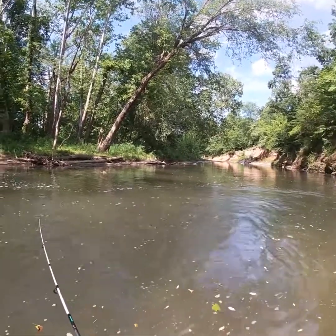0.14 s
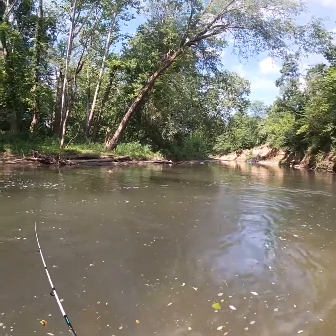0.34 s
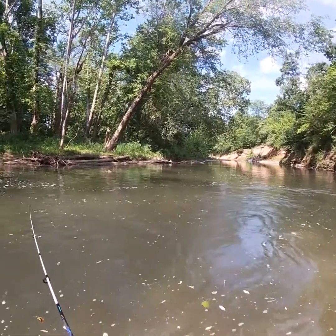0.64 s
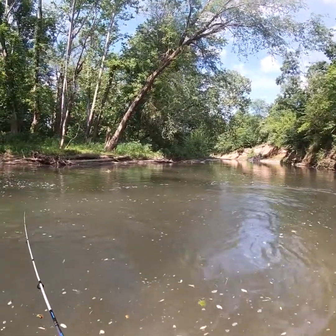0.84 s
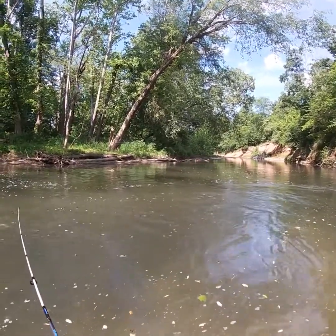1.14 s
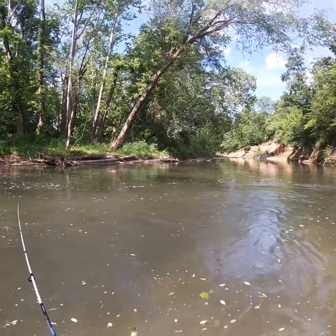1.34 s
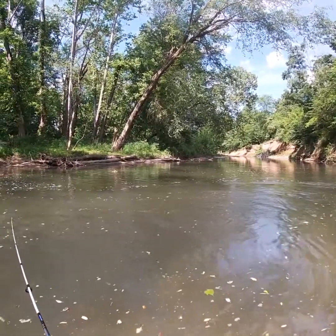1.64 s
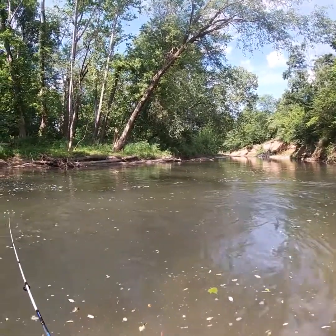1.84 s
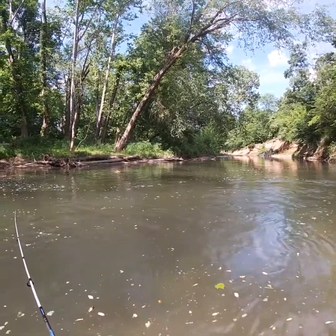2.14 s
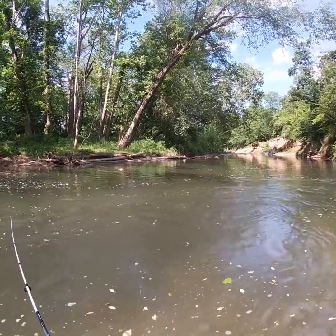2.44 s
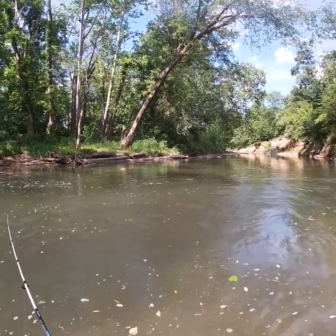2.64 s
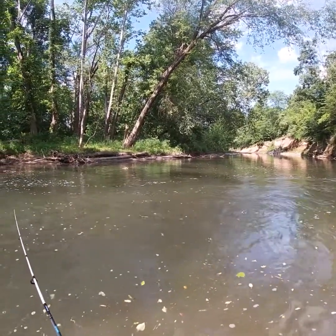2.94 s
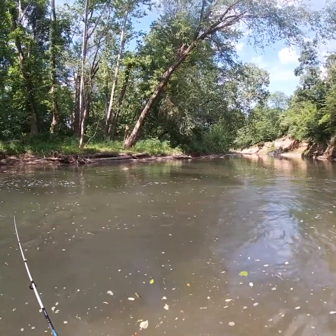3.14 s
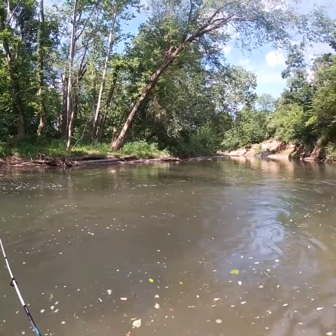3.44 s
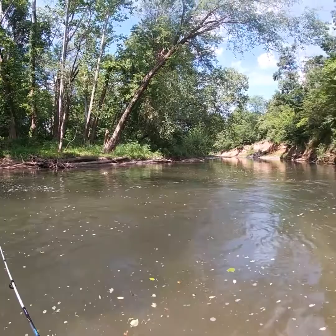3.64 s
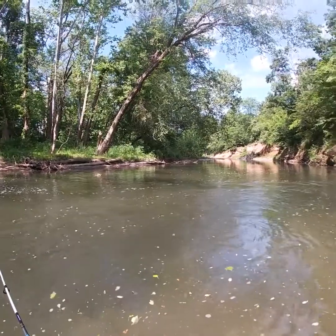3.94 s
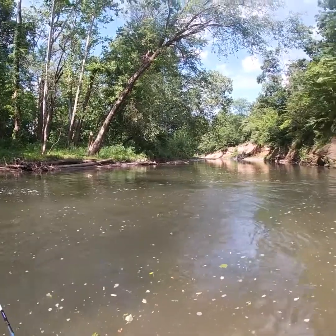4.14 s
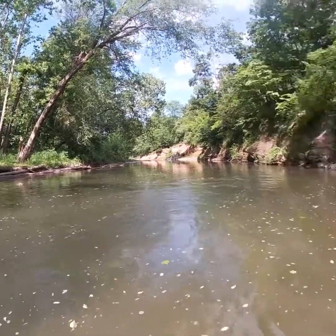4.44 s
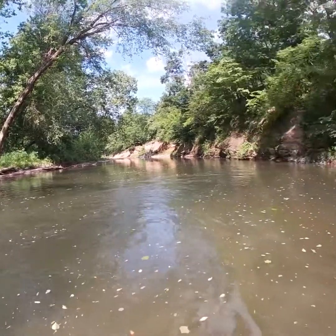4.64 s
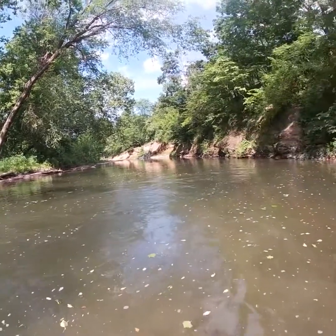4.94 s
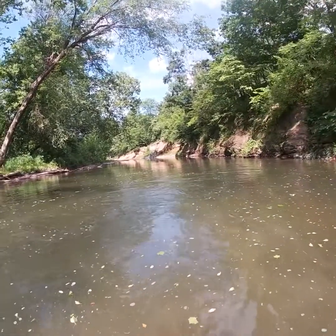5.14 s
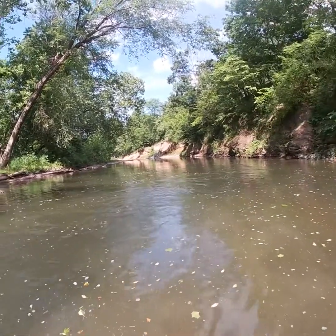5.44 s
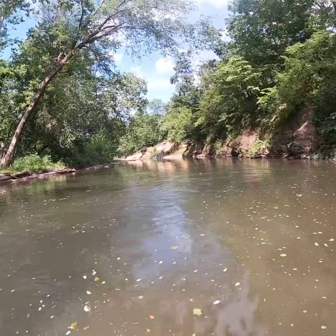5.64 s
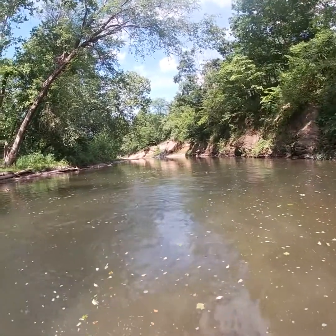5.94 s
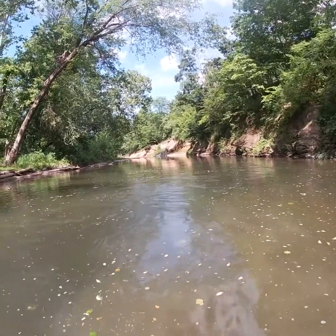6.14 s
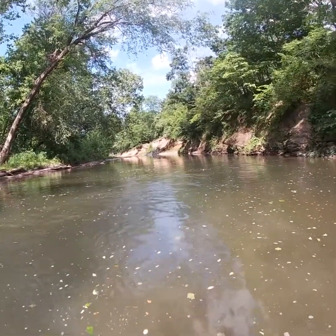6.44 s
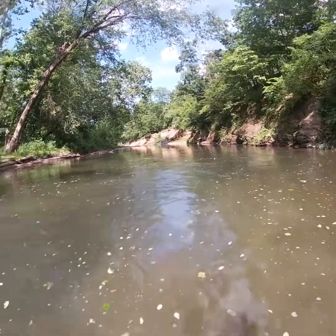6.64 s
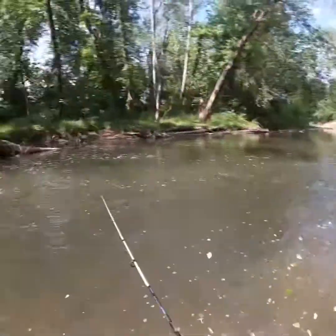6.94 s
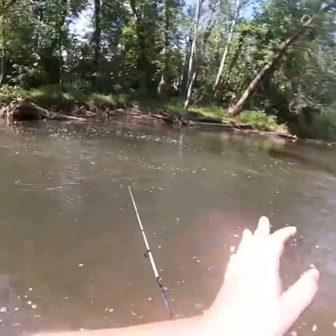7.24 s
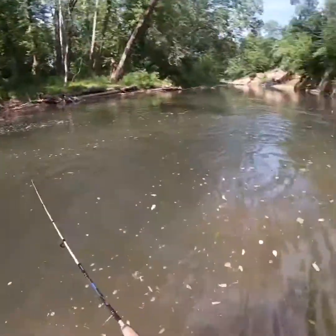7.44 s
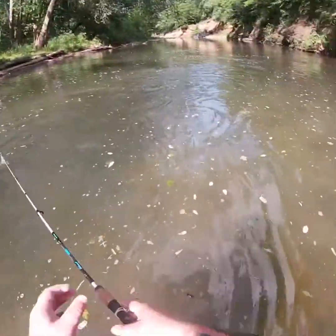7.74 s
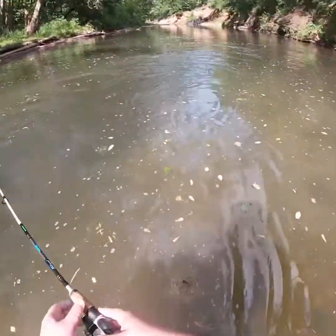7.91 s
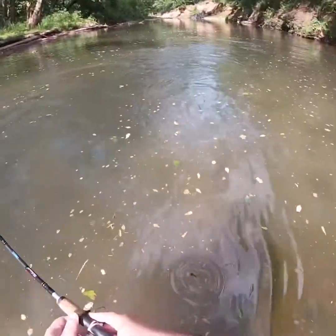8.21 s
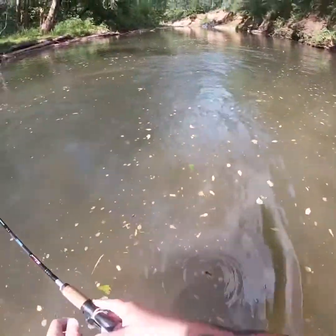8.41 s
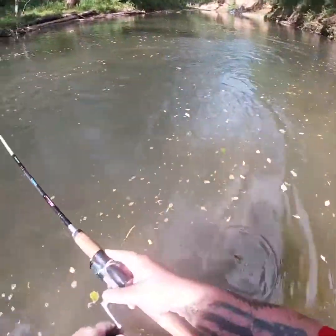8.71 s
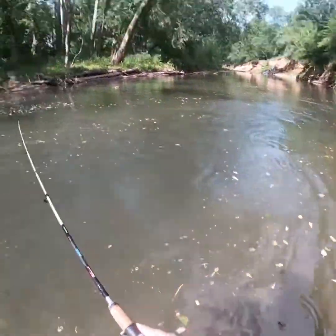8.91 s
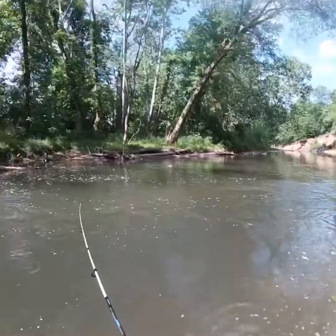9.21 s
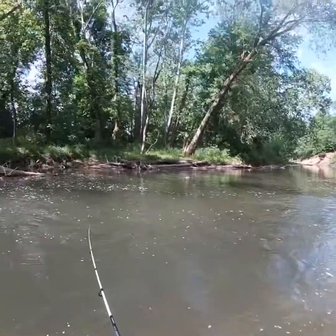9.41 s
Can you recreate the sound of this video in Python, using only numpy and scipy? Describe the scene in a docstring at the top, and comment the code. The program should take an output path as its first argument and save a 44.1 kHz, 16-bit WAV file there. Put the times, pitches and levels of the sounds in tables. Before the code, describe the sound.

A bright, dense cicada buzz fills the river bank from the start, grainy and shrill around five to six kilohertz. It peaks near 1.5 seconds, eases from about 3.3 to 4.3, builds to another peak near 7, sinks around 8.6 and partly recovers. Far behind, a second cicada crowd drones lower and hollow, with single calls from about 0.9, 4.2, 5.1 and 8.6 seconds that droop as they end. The slow river murmurs faintly with low bubbling gurgles, while a distant engine throbs about four times a second. Tiny slurred bird chirps come near 0.5, 1.6, 2.8, 4.1, 5.1 and 8.5 seconds, slightly echoed by trees. A crisp plip with spray lands at 7.0, then lighter drops near 7.3, 7.7, 8.4 and 9.4. Low air puffs brush the microphone, strongest around 7.4. The sound is mono.

```python
"""A summer river bank: from the start a huge cicada chorus, filtered clicks and noise, swells and eases in the trees.
A second, farther kind drones lower down, as narrow noise with a few single calls gliding over it. The slow river
murmurs as noise and ringing bubbles, puffs of air brush the microphone as low noise, and a far engine throbs in sines.
A bird soon chirps in short slurred sines; late on, a few drops plip as brief rising tones with a burst of spray."""
import sys
import numpy as np
from scipy import signal
from scipy.fft import rfft, irfft
from scipy.io import wavfile

SR = 44100
rng = np.random.default_rng(int(sys.argv[2]) if len(sys.argv) > 2 else 0)


def pcm_store(signal):
    """Save signal as 16-bit PCM."""
    levels = np.round(np.clip(np.atleast_2d(signal), -1, 1) * 32767)
    wavfile.write(sys.argv[1], SR, levels.astype(np.int16).T)


N = 422037


def from_db(db):
    """Decibels to gain."""
    return 10 ** (np.asarray(db) / 20)


def rms_one(x):
    """Scale to unit power."""
    return x / np.sqrt(np.mean(x ** 2) + 1e-20)


def in_time(rows):
    """Draw each column of a time table as a curve with a value at every sample."""
    s, *columns = np.transpose(rows)
    return [np.interp(np.arange(N) / SR, s, column) for column in columns]


def coloured(x, points):
    """Filter x to a drawn spectrum that falls 60 dB an octave beyond its ends; unit power."""
    hz, db = np.transpose(points)
    octave = np.log2(np.maximum(np.fft.rfftfreq(N, 1 / SR), 1))
    octaves_beyond = np.abs(octave - np.clip(octave, np.log2(hz[0]), np.log2(hz[-1])))
    gain_db = np.interp(octave, np.log2(hz), db) - 60 * octaves_beyond
    return rms_one(irfft(rfft(x) * from_db(gain_db), N))


def drift(knots_per_s):
    """Smooth random wander about 0: straight lines between normal draws of spread 1."""
    knots = rng.standard_normal(int(N / SR * knots_per_s) + 2)
    return np.interp(np.arange(N) / SR * knots_per_s, np.arange(len(knots)), knots)


def resonate(x, hz, width_hz):
    """One resonance with about unit gain at its peak; a narrower one rings longer."""
    r = np.exp(-np.pi * width_hz / SR)
    zeros = np.array([1, 0, -1]) * (1 - r * r) / 2
    poles = [1, -2 * r * np.cos(2 * np.pi * hz / SR), r * r]
    return signal.lfilter(zeros, poles, x + 1e-18)


def tone(hz):
    """A sine that follows a pitch curve."""
    return np.sin(2 * np.pi * np.cumsum(hz) / SR)


def swell(s, rise_s, fall_s):
    """A rounded hump of height 1 that tops out at time s."""
    ramp = np.interp(np.arange(N) / SR, [s - rise_s, s, s + fall_s], [0, 1, 0])
    return np.sin(np.pi / 2 * ramp) ** 2


def add(out, s, sound):
    """Mix a sound in at time s."""
    start = max(int(s * SR), 0)
    out[start:start + len(sound)] += sound[:max(N - start, 0)]


def woods(x, t60, wet_db):
    """Trunks and leaves scatter a sound into a smooth noise tail, which falls 60 dB in t60 seconds."""
    t = np.arange(SR // 2) / SR
    tail = rng.standard_normal(len(t)) * np.exp(-np.log(1000) * t / t60)
    scattered = signal.fftconvolve(x, tail / np.linalg.norm(tail))[:N]
    return x + from_db(wet_db) * scattered


def tymbals(clicks_per_s, wander, count):
    """Each near cicada buckles its ribs in a fast, uneven click train of its own rate."""
    clicks = np.zeros(N)
    for _ in range(count):
        own_rate = clicks_per_s * 2 ** rng.uniform(-.5, .5)
        rate = own_rate * (1 + wander * drift(40))
        cycles = rng.random() + np.cumsum(rate) / SR
        at = np.flatnonzero(np.diff(np.floor(cycles)))
        clicks[at] += rng.choice([-1, 1]) * from_db(rng.normal(0, 3.0, len(at)))
    return rms_one(clicks)


def buzzing_cicadas():
    """Near click trains over a noise wash of thousands; the bright core swells more than the lower flank."""
    # swell of the bright core: start_s, level_db
    chorus = [(0.05, -21.5), (1.47, -20), (3.29, -26), (3.42, -25.5), (4.31, -25), (4.84, -22.5),
              (5.15, -23), (5.6, -22), (7.08, -20), (7.89, -23), (8.6, -26.5), (9.5, -23.5)]
    # colour of the buzz: pitch_hz, relative level_db (per Hz)
    chorus_colour = [(2300, -44), (2900, -30.5), (3300, -21), (3750, -14.5), (4100, -11.5), (4600, -11),
                     (5200, -2.5), (5650, 0.5), (6100, -1.1), (6700, -8), (7500, -17), (8150, -21),
                     (9000, -35.5), (9400, -44)]
    # faint overtones of the tymbals: pitch_hz, relative level_db (per Hz)
    sheen_colour = [(7500, -10), (9000, -5.5), (9900, 1), (11400, -6.5), (13000, -7.5), (14300, -20),
                    (15200, -36)]
    # the flank's level at the mean swell, and the share of the core's swell in dB that it follows
    flank_mean_db, flank_follows = -35.5, 0.67

    core_db, = in_time(chorus)
    flank_db = flank_mean_db + flank_follows * (core_db - core_db.mean())
    near = tymbals(clicks_per_s=330, wander=.08, count=12)
    clicks = rng.standard_normal(N) + from_db(-8.5) * near
    buzz = coloured(clicks, chorus_colour)
    # split at 4750 Hz, without phase shift
    flank = signal.sosfiltfilt(signal.butter(10, 4750, fs=SR, output="sos"), buzz)
    sheen = from_db(-40) * coloured(clicks, sheen_colour)
    core = rms_one(buzz - flank) + sheen
    return from_db(core_db) * core + from_db(flank_db) * rms_one(flank)


def droning_cicadas():
    """A far crowd merges into one hollow note; single calls creep up in pitch and droop at the end."""
    # swell of the crowd: start_s, level_db
    drone_swell = [(0.05, -53), (0.15, -53), (1.59, -56.5), (3.16, -54), (3.43, -50.5), (4.97, -51.5),
                   (6.2, -56.5), (7.59, -58), (9.45, -51.5)]
    # colour of the crowd: pitch_hz, relative level_db (per Hz)
    drone_colour = [(950, -41), (1120, -15.5), (1210, -6), (1260, -5.5), (1335, 2.5), (1400, -2.5),
                    (1440, -9), (1540, -12.5), (1680, -22)]
    # single calls that stand out: start_s, length_s, top pitch_hz, peak level_db (before the woods)
    droners = [(0.898, 1.55, 1409, -63), (4.202, 1.18, 1425, -57.5), (5.099, 1.19, 1361, -63),
               (8.6, 1.3, 1400, -57.5)]
    droop_db = -59.5   # peak level just before each call fades out, before the woods

    crowd_db, = in_time(drone_swell)
    calls = np.zeros(N)
    for s, length, hz, db in droners:
        t = np.arange(int(length * SR)) / SR
        glide = np.interp(t, [0, length - .25, length - .15, length], [0.99, 1, .92, 0.54])
        pitch = hz * glide + 12 * drift(90)[:len(t)]
        level = np.interp(t, [0, .3, length - .25, length - .06, length],
                          [0, from_db(db), from_db(db), from_db(droop_db), 0])
        add(calls, s, level * tone(pitch))
    crowd = from_db(crowd_db) * coloured(rng.standard_normal(N), drone_colour)
    return crowd + woods(calls, t60=.4, wet_db=-2.0)


def river(bubbles_per_s, count):
    """A soft wash of noise, and gurgles of low bubbles that ring for a few cycles each."""
    # level of the wash: start_s, level_db
    wash_swell = [(0.1, -54.5), (1.3, -59), (2.1, -58.5), (2.4, -55.3), (4.4, -54.5), (7.7, -57.7),
                  (9.4, -53)]
    # colour of the wash: pitch_hz, relative level_db (per Hz)
    wash_colour = [(20, 2), (50, 9), (90, 10), (125, 7), (170, 7), (230, 3), (350, -3), (500, -1),
                   (700, 0.5), (1050, 1.5), (1650, -2), (1850, -2), (2100, -2), (2600, -4), (4000, -15)]
    # the current stirs and gurgles: peak_s, length_s, level_db (added to the calm level)
    gurgles = [(.17, .35, -64), (.68, .6, -60), (2.52, .5, -62.5), (4.22, .5, -61.5), (5.28, .25, -64.5),
               (5.72, .3, -66), (8.37, 0.49, -62.5), (9.3, .7, -66)]
    calm_gurgle_db = -73   # between the stirs

    wash_db, = in_time(wash_swell)
    wash = from_db(wash_db) * coloured(rng.standard_normal(N), wash_colour)
    bubbles = np.zeros(N)
    for hz in np.geomspace(240, 490, count):
        born = rng.random(N) < bubbles_per_s / count / SR
        bubbles += resonate(born * rng.standard_normal(N), hz, hz / 8)
    stirs = sum(from_db(db) * swell(s, length / 2, length / 2) for s, length, db in gurgles)
    stir = from_db(calm_gurgle_db) + stirs
    return wash + stir * rms_one(bubbles)


def air():
    """Moving air rumbles on the microphone port: low noise that swells with each puff."""
    # puffs: peak_s, rise_s, fall_s, level_db (added to the still air)
    puffs = [(.05, .05, 0.18, -53), (6.85, .3, 0.63, -50), (7.38, .45, .45, -42), (8.9, .6, 0.42, -53)]
    # colour of the rumble: pitch_hz, relative level_db (per Hz)
    air_colour = [(10, 4), (22, -2), (35, -7), (60, -25), (150, -29), (400, -40)]
    still_air_db = -65   # between the puffs

    gusts = sum(from_db(db) * swell(s, rise_s, fall_s) for s, rise_s, fall_s, db in puffs)
    level = from_db(still_air_db) + gusts
    return level * coloured(rng.standard_normal(N), air_colour)


def far_engine(depth, waver_hz):
    """A low rumble that throbs about four times a second under a wavering drone."""
    # path of the drone: start_s, pitch_hz, level_db
    engine_path = [(1.2, 131.4, -77), (2.5, 158, -60), (3.8, 151, -58), (4.6, 134, -65),
                   (5.5, 131.2, -57.5), (6.3, 131, -64), (8.0, 130, -63.5), (9.0, 130, -56.5)]
    # resonances of the throb: pitch_hz, width_hz, relative level_db
    throb_modes = [(55.3, 9, -2), (85.7, 26.9, -7), (118, 27, -10.5)]
    # level at the drone's mean, and the share of the drone's swing in dB that the throb follows
    throb_mean_db, throb_follows = -56, .2
    # the throb quickens very slightly
    phase_start_s, throbs_per_s, quicken_per_s2 = .016, 3.75, .02
    # its speed hunts: period, throbs gained and lost, time of greatest lead (after phase_start_s)
    hunt_s, hunt_turns, hunt_ahead_s = 4.8, .06, 2.7

    drone_hz, drone_db = in_time(engine_path)
    t = np.arange(N) / SR - phase_start_s
    hunt = hunt_turns * np.cos(2 * np.pi * (t - hunt_ahead_s) / hunt_s)
    turn = throbs_per_s * t + quicken_per_s2 * t ** 2 / 2 + hunt
    # each resonance is a sine whose pitch wanders across its width
    rumble = sum(from_db(db) * tone(hz + width_hz / 2 * drift(25)) for hz, width_hz, db in throb_modes)
    throb = rms_one(rumble * (1 + depth * np.cos(2 * np.pi * turn)))
    drone = rms_one(tone(drone_hz + waver_hz * drift(60)) * from_db(3.2 * drift(40)))
    throb_db = throb_mean_db + throb_follows * (drone_db - drone_db.mean())
    return from_db(throb_db) * throb + from_db(drone_db) * drone


def bird():
    """Short whistles from the trees, slurred up or down through one pitch and fluttering in level."""
    # notes: start_s, length_s, slide_hz (start to end), peak level_db (before flutter and woods)
    notes = [(.445, .03, -450, -55), (.495, .049, 300, -52), (.61, .025, -450, -54),
             (1.615, .03, -400, -54), (2.755, .025, -400, -53), (4.023, .025, 100, -52),
             (4.10, 0.023, -400, -50), (5.095, .03, -600, -52), (5.142, .065, 330, -49),
             (5.24, .03, -550, -52), (8.434, .032, -220, -48), (8.597, .022, -430, -47)]
    mid_hz, bend_hz = 2595, 70   # pitch in mid-note; both ends curl up by the bend

    out = np.zeros(N)
    for s, length, slide_hz, db in notes:
        u = np.linspace(0, 1, int(length * SR))
        pitch = mid_hz + slide_hz * (u - .5) + bend_hz * (2 * u - 1) ** 2
        add(out, s, from_db(db) * np.sin(np.pi * u) * tone(pitch))
    flutter = from_db(2.5 * drift(120))
    return woods(out * flutter, t60=0.34, wet_db=-5)


def drops(rise, spray_s):
    """Each drop smacks the surface and traps a bubble that rings briefly, rising a little in pitch."""
    # plips and plops: start_s, peak level_db, mid pitch_hz, length_s, spray_db (before its filter and gain)
    plips = [(6.9815, -32, 1840, .012, -34), (7.019, -49, 258, 0.029, -70), (7.346, -51, 1650, .009, -56),
             (7.714, -43, 1900, .003, -43), (8.379, -35, 1930, 0.0036, -39), (9.43, -49.5, 520, .04, -70)]

    bubbles, smacks = np.zeros(N), np.zeros(N)
    for s, db, hz, length, spray_db in plips:
        u = np.linspace(0, 1, int(length * SR))
        shape = np.interp(u, [0, .18, .55, 1], [0.14, 1, 0.68, 0.24]) * (1 - u ** 4)
        add(bubbles, s, from_db(db) * shape * tone(hz * (1 + rise * (u - .5))))
        t = np.arange(SR // 50) / SR
        spray = np.exp(-t / spray_s) * rng.standard_normal(len(t))
        add(smacks, s, from_db(spray_db) * spray)
    spray_band = signal.butter(2, [1650, 2750], "band", fs=SR, output="sos")
    return bubbles + 2 * signal.sosfilt(spray_band, smacks)


def scene():
    """Everything heard from the bank, in one channel."""
    insects = buzzing_cicadas() + droning_cicadas()
    water = river(bubbles_per_s=520, count=14) + drops(rise=0.029, spray_s=0.0047)
    engine = far_engine(depth=1.0, waver_hz=16)
    return (insects + water + air() + engine + bird())[None]


def record(dry):
    """A steep elliptic low-pass cuts the top above 14.8 kHz."""
    top_cut = signal.ellip(10, .1, 80, 14800, fs=SR, output="sos")
    return signal.sosfilt(top_cut, dry)


dry = scene()
out = record(dry)
pcm_store(out)
```